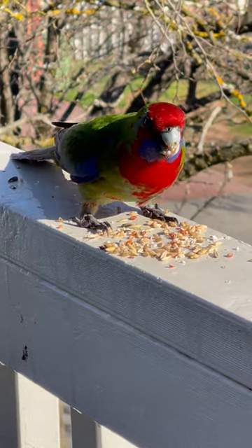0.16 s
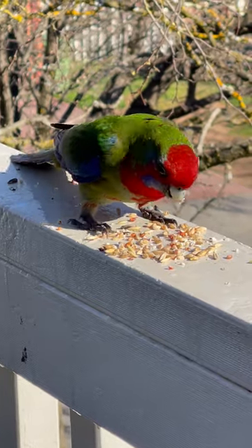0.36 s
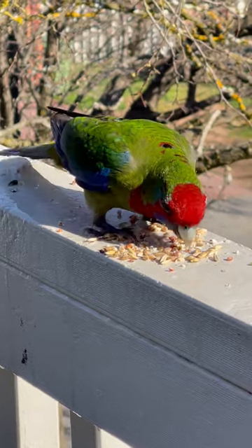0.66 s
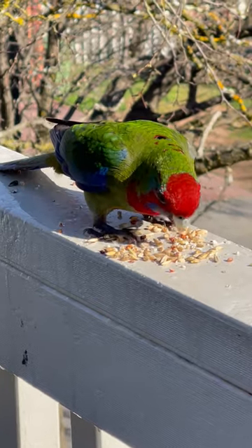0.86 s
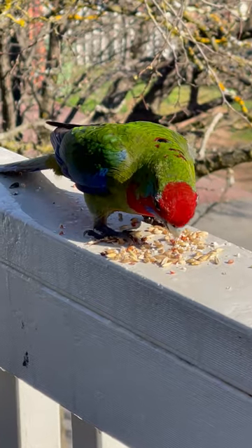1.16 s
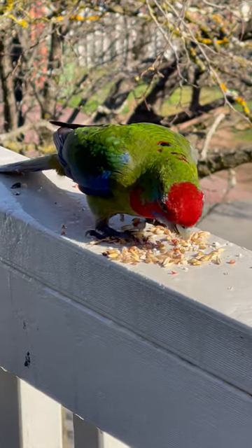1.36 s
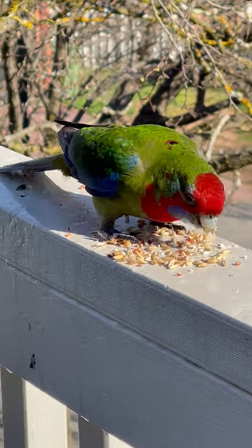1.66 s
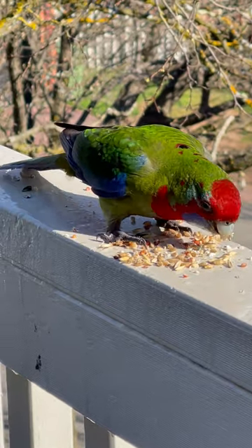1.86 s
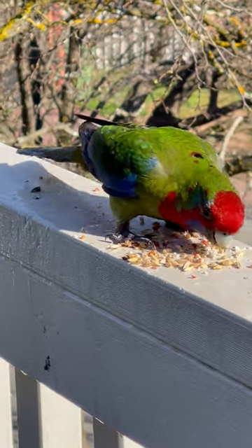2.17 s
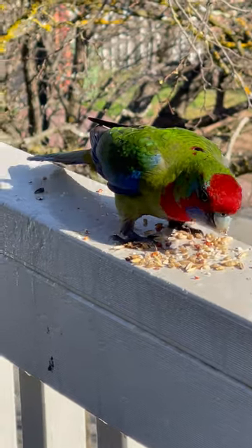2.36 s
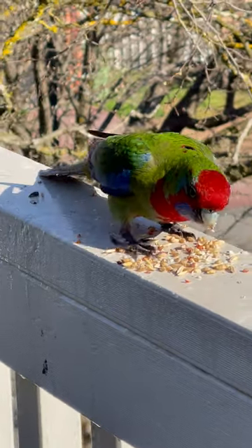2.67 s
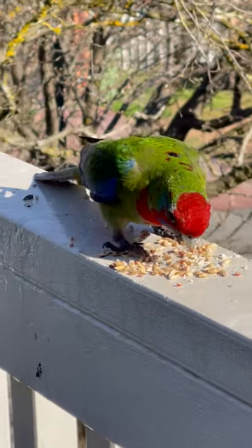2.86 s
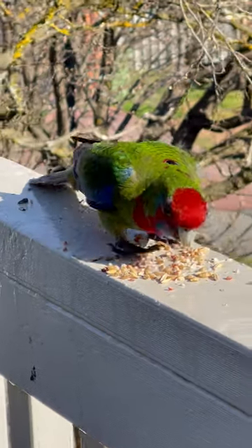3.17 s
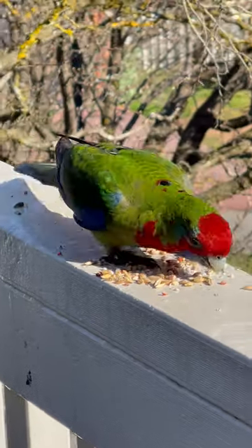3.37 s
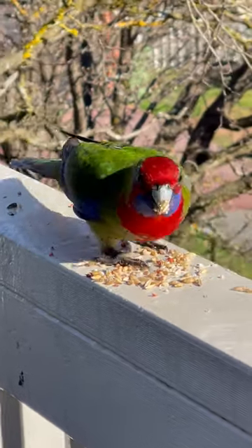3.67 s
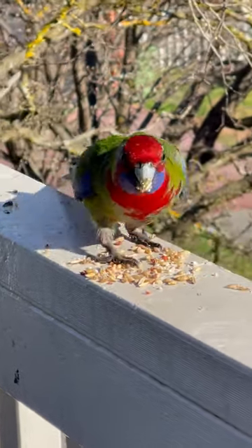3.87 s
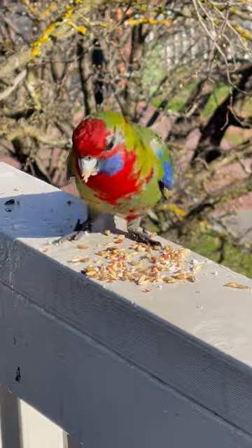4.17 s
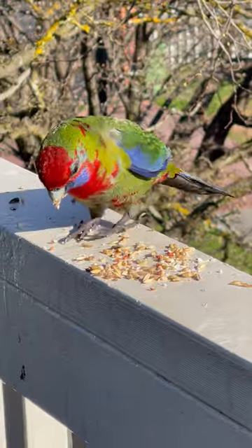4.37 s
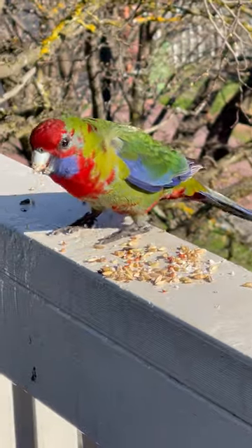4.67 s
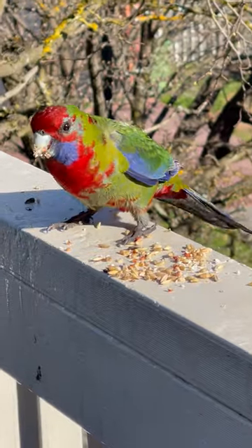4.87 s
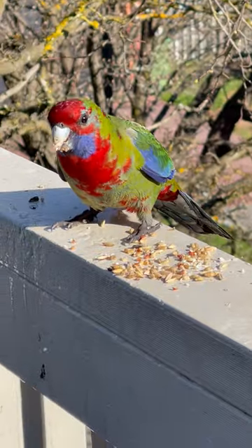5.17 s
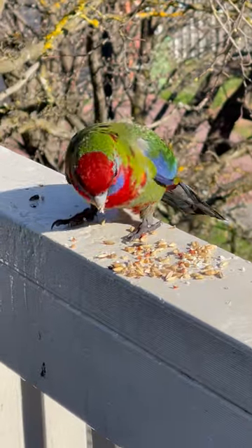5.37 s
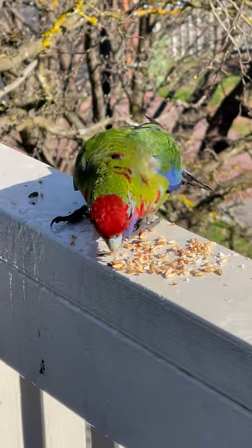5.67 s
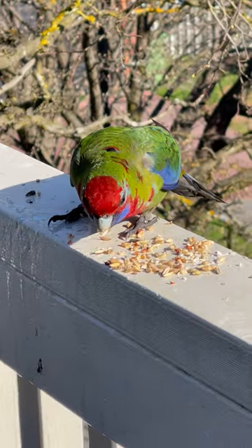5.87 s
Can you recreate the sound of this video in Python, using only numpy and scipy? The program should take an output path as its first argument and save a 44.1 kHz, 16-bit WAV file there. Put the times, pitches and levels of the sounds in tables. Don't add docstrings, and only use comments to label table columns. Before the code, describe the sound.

A quiet outdoor bed of deep town rumble and a throbbing engine hum around 83 Hz, with very faint hiss. A small dry scuff opens, then a hard bright crack at 0.1 s and the loudest, sharpest blow at 0.16 s, with a short yard echo. From 0.4 to 2.5 s come small nibbles and dull wooden knocks, while distant birds give paired falling yelps, tiny peeps, thin whistles and a brief trill near 2.5 s. A clearer snap lands at 2.5 s. Around 3.0 to 3.7 s, claws and beak scrape and skitter on the hollow rail, densest near 3.45 s. Crisp cracks follow at 4.1 and 4.6 s, a very loud one at 5.07 s, then smaller ticks and light scuffs to 6 s. A nasal warble sounds at 5.4 to 5.6 s, with rising peeps, as a vehicle's soft tyre roar and whining gears swell.

```python
import sys
import numpy as np
from scipy import signal
from scipy.fft import rfft, irfft, next_fast_len
from scipy.io import wavfile
from scipy.ndimage import uniform_filter1d

SR = 44100
rng = np.random.default_rng(int(sys.argv[2]) if len(sys.argv) > 2 else 0)


def wrap_up_sound(samples):
    columns = np.atleast_2d(samples).T
    tamed = np.clip(columns, -1, 1)
    steps = np.round(tamed * 32767).astype(np.int16)
    wavfile.write(sys.argv[1], SR, steps)


def ratio(d):
    e = np.asarray(d, float) / 20
    return 10 ** e


N = 266099
BINS_HZ = np.fft.rfftfreq(1024, 1 / SR)
FRAMES_S = np.arange(N // 256 + 5) * 256 / SR

# [t/s, level/dB]
TOWN_LEVEL = [(0.0, -56.5), (2.72, -56), (3.06, -52), (3.53, -55.5), (3.88, -54.5), (4.2, -54.5),
              (5.69, -52.5), (6.03, -54.5)]
VEHICLE_LEVEL = [(0.0, -61.5), (.5, -60), (1.3, -61.5), (2.72, -61.5), (3.56, -58), (3.96, -57), (5.6, -54),
                 (6.03, -54)]
# [f/Hz, density/dB]
TOWN_COLOUR = [(20, -52.5), (30, -28.5), (45, 1.5), (60, 3.3), (120, -4.5), (250, -8.5), (500, -22),
               (1000, -33), (2500, -58.5)]
FAR_TYRES = [(150, -6.5), (300, -4), (500, -3), (1000, -9), (1700, -13.5), (2200, -17), (3000, -22.5),
             (4000, -40), (5500, -54.5), (8000, -57)]
NEAR_TYRES = [(150, -8.5), (300, -0.5), (500, -2), (1000, -6), (1700, -13), (2200, -22), (3000, -22),
              (4000, -28.5), (5500, -29.5), (8000, -53)]
# [t/s, f/Hz, level/dB]
HUM = [(0.0, 82.58, -51), (1.1, 82.59, -48.5), (2.0, 84.1, -58), (2.64, 83.9, -53.5), (3.48, 82.5, -59),
       (4.38, 84.15, -68), (4.43, 85.6, -51.5), (5.14, 86.07, -50), (5.69, 85.04, -57.5), (6.03, 84.6, -60)]
# [t/s, f/Hz, level/dB]
GEARS = [
    [(3.15, 200, -77), (3.33, 202.6, -55.5), (3.47, 200, -67.5), (3.6, 197.7, -56), (3.85, 197, -55.5), (4.3, 193.5, -59.5), (4.45, 190.5, -66)],
    [(4.7, 188, -70), (4.95, 190, -58), (5.3, 185, -62), (5.7, 200, -57.5), (6.03, 200, -68)],
    [(4.9, 293.1, -64), (5.2, 307.7, -61.5), (5.55, 320.7, -54.5), (5.8, 322.5, -54), (5.88, 313, -60), (5.95, 290, -69)],
]
# [f/Hz, density/dB]
HISS_COLOUR = [(2000, -20), (4000, -9.5), (8800, -7), (9700, -6), (10300, 10), (10900, -13.5),
               (12000, -23.5), (12800, -31.5), (14000, -61)]

# [hardest moment t/s, build-up/s, force level/dB, body rel. level/dB, dry rasp rel. level/dB]
SCUFFS = [(0.004, 0.012, -78, 1, 8.5), (0.063, 0.011, -60.5, -13, -1.5), (0.436, 0.0059, -77.5, -13, -2),
          (0.774, 0.014, -83, -6.5, 5.5), (1.684, 0.0067, -68.5, -6, -3), (1.935, .05, -77, -2.5, -3.5),
          (2.28, 0.12, -66.5, 2, -17), (2.428, 0.019, -71, -4, -10.5), (2.808, 0.009, -75, 7, 7.5),
          (2.976, 0.027, -56.5, 10, -5.5), (3.134, 0.018, -55.5, -2, -16.5), (3.41, 0.007, -53.5, -25, -26),
          (3.43, .014, -54.5, -25.5, -22), (3.445, 0.0092, -55.5, -20, -20),
          (3.468, 0.012, -57.5, 9, -14.5), (3.583, 0.013, -51.5, 0, -39), (3.725, 0.042, -55.5, -13, -17),
          (5.326, 0.0088, -67, -3, 0), (5.56, 0.18, -72.5, 4, -7), (5.74, 0.13, -62.5, -2, -22),
          (5.96, 0.024, -70.5, -6, 6.5), (6.01, 0.046, -69, -9, -0.5)]
# [f/Hz, density/dB]
RASP_COLOUR = [(1500, -9), (3800, -5), (5500, -4), (8500, -3.5), (10500, 0), (11500, -20), (12600, -54.5)]
# [f/Hz, width/Hz, level/dB]
RAIL = [
    (1042, 360, -0.5),
    (2100, 840, 4.5),
    (3500, 2500, 0),
    (2080, 170, 1.5),
]
# [t/s, peak level/dB, f/Hz]
SLIPS = [(2.9739, -58, 3660), (2.9786, -44, 2040), (2.9806, -53, 3800), (2.9923, -54, 3640),
         (3.0101, -54, 3710), (3.1306, -53, 2040), (3.137, -42, 2104), (3.1426, -52, 2100),
         (3.4106, -45.5, 2030), (3.4277, -53, 2480), (3.43, -42.5, 2040), (3.433, -53, 2800),
         (3.439, -52, 2600), (3.4451, -38, 2100), (3.4454, -55, 2500), (3.452, -49, 3020),
         (3.4585, -52, 3550), (3.4593, -43, 2110), (3.4621, -57, 2560), (3.4639, -42, 2150),
         (3.4688, -48, 3080), (3.4712, -41, 2040), (3.4727, -53, 3670), (3.475, -50, 2950),
         (3.4771, -44, 1956), (3.478, -59, 3720), (3.481, -58, 2900), (3.486, -54, 1950),
         (3.5737, -51, 2810), (3.578, -49, 2740), (3.5864, -44.5, 1910), (3.587, -50, 2650),
         (3.5925, -53, 2710), (3.5943, -48, 1790), (3.7103, -47, 1926), (3.7158, -51, 2000),
         (3.7233, -48, 1820), (3.7368, -57, 2080)]

# [t/s, snap level/dB, brightness/dB per octave, echo rel. level/dB]
CRACKS = [(0.1095, -25.5, -1.4, -11.5), (1.6782, -51, -5.5, -4), (1.8868, -54.5, 0, -13),
          (1.913, -49.5, -15, 6.5), (2.8, -46.5, 2.5, 1), (4.1063, -50, 11.5, -6), (4.1234, -30.5, 33, -11),
          (4.32, -52, 3, -5), (4.4003, -55.5, 12, -14), (4.6403, -34.5, -1, -12.5),
          (5.0705, -16.5, -4.5, -14), (5.3211, -43, -1.5, -9), (5.334, -40.5, -12.5, -12),
          (5.4797, -48.5, -11, 5), (5.7984, -45.5, 7, -0.5), (5.9545, -38.5, -9.5, -16)]
NIBBLES = [(0.4325, -54, -9.5, -10), (0.723, -65, -12, -6.5), (2.0318, -50, -18, -8.5),
           (1.5522, -59.5, -19, -6.5), (2.145, -57, -11, -6), (2.2748, -48, -14.5, -7),
           (2.373, -53, -14.5, -8), (2.515, -38.5, -4, -6.5), (2.603, -53, -3, -3), (2.9531, -47, 0, -4),
           (3.5722, -46, 11, -1.5), (4.5955, -58.5, 15.5, -11), (5.6073, -55.5, -6, 5.5), (5.9, -55, -7, 2)]
# [t/s, snap level/dB, knock rel. level/dB, echo rel. level/dB]
PECKS = [
    (0.16, -7, -27, -16.5),
    (1.5528, -65.5, 16.5, -11),
    (2.0323, -67.5, 18, 3),
    (3.5404, -63, 18.5, -2),
]
# [f/Hz, density/dB]
SNAP_COLOUR = [(700, -42.5), (1300, -25), (2000, -33.5), (3000, -27.5), (4200, -13.5), (5500, -10.5),
               (7000, 0), (8500, 2.5), (10750, 5.5), (11600, -12.5), (12500, -21.5), (13600, -18.5),
               (15200, -39.5), (16500, -42)]
# [t/s, peak level/dB, f/Hz, swell/s]
RINGS = [(.1618, -38.5, 2600, 0.00048), (2.7, -56, 4300, 0.00032), (2.8, -39, 13800, .0003),
         (2.5166, -48.5, 5200, 0.00045), (2.5168, -42, 2950, .0007), (1.68, -61.5, 5600, 0.00101),
         (1.691, -63, 5600, 0.00101), (2.5064, -46, 13600, 0.00035), (4.1245, -38, 13400, 0.00009),
         (4.1245, -53, 5600, 0.00027), (4.642, -43.5, 4020, 0.00042), (5.0721, -32, 4260, .0003),
         (5.0719, -36, 13500, .0003), (3, -47, 2400, 0.00021), (1.5535, -54, 1800, 0.00017),
         (2.0335, -53, 2200, .0002), (3.727, -62, 6900, 0.0011), (4.5, -43, 3250, 0.00028),
         (.1672, -31.5, 6300, .0003), (.1686, -31, 8600, 0.00043), (2.756, -61.5, 7500, 0.00036),
         (5.9012, -56, 8000, .0003)]
# [t/s, level/dB]
BOUNCES = [(.0025, -23), (.0053, -10.5), (.0069, -8)]
# [f/Hz, t60/s]
YARD_DECAY = [(1000, 0.1), (3000, 0.21), (6000, 0.2), (9000, 0.2), (12000, 0.12), (13500, 0.029)]

# [t/s, length/s, from f/Hz, to f/Hz, top
# level/dB]
PEEPS = [(0.322, 0.032, 2070, 2520, -60), (0.359, 0.016, 2020, 2640, -57), (0.482, 0.041, 3410, 3750, -75),
         (0.52, .014, 3690, 2980, -69.5), (0.534, 0.03, 3020, 2820, -65), (0.81, 0.038, 2335, 2200, -66),
         (0.885, 0.057, 4600, 3800, -83.5), (0.937, .04, 1910, 1900, -65.5),
         (2.306, 0.038, 2190, 2770, -62.5), (2.675, 0.052, 6040, 5750, -74), (2.73, .07, 5880, 5700, -83),
         (2.803, .09, 5800, 5600, -82), (2.668, .02, 5350, 5050, -78), (2.71, .04, 5150, 5150, -83),
         (3.293, .055, 3356, 3250, -75.5), (5.23, 0.021, 3440, 4430, -64), (5.258, .026, 4450, 4150, -72),
         (5.353, 0.027, 3230, 4550, -68), (5.612, 0.027, 3290, 4770, -63), (5.728, 0.036, 3060, 4870, -61),
         (3.694, .036, 10550, 11000, -61), (5.921, 0.024, 2600, 2620, -64),
         (.874, .022, 4000, 3300, -69), (.9, .014, 3950, 3350, -68), (1.008, .022, 6300, 5950, -78),
             (.485, .05, 6900, 7400, -81), (2.391, .016, 2650, 2550, -65), (.434, .016, 3500, 3150, -68),
             (.555, .02, 2600, 2350, -68), (.572, .03, 2300, 2100, -68), (.672, .014, 2300, 2350, -69),
             (.862, .014, 2300, 2300, -68), (.96, .02, 2550, 2350, -68), (4.43, .04, 3350, 3300, -72)]
# [t/s, level/dB, wait before second/s, second rel. level/dB]
YELPS = [(0.417, -57.5, .044, -13), (0.541, -60, 0.036, -8), (0.673, -60.5, 0.037, -5),
         (0.809, -61, 0.041, -6), (0.941, -63.5, 0.038, -3.5), (1.08, -63, 0.034, -6),
         (1.207, -63.5, 0.036, -2), (1.347, -65, 0.038, -5), (2.38, -64, .031, -9),
         (2.504, -64.5, 0.032, -16), (2.641, -66, .045, -16)]
# [t/s, length/s, f/Hz, level/dB]
WHISTLES = [
    (0.568, 0.043, 3090, -69),
    (0.913, 0.089, 2990, -65),
    (1.721, 0.085, 3000, -64),
    (2.204, 0.092, 2905, -62),
    (2.655, 0.094, 2910, -63.5),
]
# [t/s, f/Hz, level/dB]
SWOOP = [(2.272, 4200, -78), (2.287, 3950, -68), (2.3, 3720, -63), (2.315, 3560, -71), (2.328, 3500, -70),
         (2.342, 3800, -76)]
# [t/s, f/Hz, level/dB]
TRILL = [(2.432, 3030, -72), (2.465, 3125, -61), (2.545, 3200, -65), (2.565, 3050, -68), (2.59, 3130, -65),
         (2.6, 3000, -69), (2.618, 3220, -67), (2.625, 3200, -69)]
# [t/s, f/Hz, level/dB]
WARBLE = [(5.396, 730, -68), (5.43, 795, -63), (5.445, 760, -60), (5.456, 892, -56), (5.469, 855, -56.5),
          (5.475, 773, -54), (5.515, 725, -55), (5.526, 778, -59), (5.538, 755, -55), (5.55, 870, -54.5),
          (5.568, 840, -56), (5.582, 780, -64)]
# [f/Hz, level/dB]
BEAK = [(600, -30), (1650, -8), (2200, -9), (2600, 1.5), (3050, -1.5), (3450, -15), (3800, -15),
        (4500, -19), (5500, -34)]

# [f/Hz, phase/rad]
PORT_LAG = [(0, 0), (1700, 0), (2700, .7), (3900, .7), (4450, 1.4), (4800, 3.05), (5200, 5.0), (5600, 6.1),
            (6200, 6.5), (8000, 8.5), (9150, 9.55), (10300, 10.5), (11300, 11.7), (11900, 12.5),
            (13500, 13.3), (22050, 13.4)]
# [f/Hz, likeness 0..1]
PORT_LIKENESS = [(100, .999), (300, .95), (600, .72), (1000, .72), (1400, .5), (1750, .95), (3000, .97),
                 (5000, .97), (12000, .94)]
# [f/Hz, level/dB]
PORT_LEAN = [(60, -.5), (300, -2), (600, -4.5), (1200, -1.5), (1700, 0.3), (12000, 0.5)]
# [f/Hz, level/dB]
MIC = [(15, -40), (28, -16), (42, -1), (60, 1.5), (90, 0), (11700, 0), (12300, -9), (12800, -24),
       (14000, -18)]


def evened(x):
    return x / np.sqrt(np.mean(x ** 2) + 1e-20)


def drift(length, size):
    return evened(uniform_filter1d(rng.standard_normal(length), size=size))


def read(points, hz):
    f, value = np.transpose(points)
    return np.interp(np.log(hz + 1), np.log(f + 1), value)


def along(rows):
    s, *columns = np.transpose(rows)
    t = np.arange(s[0], s[-1], 1 / SR)
    return s[0], [np.interp(t, s, c) for c in columns]


def level_over_time(rows):
    return np.interp(np.arange(N) / SR, *np.transpose(rows))


def add(mix, s, sound):
    part = mix[round(s * SR):][:len(sound)]
    part += sound[:len(part)]


def resonate(x, hz, width):
    turn = np.exp(2j * np.pi * np.cumsum(hz * np.ones(len(x))) / SR)
    r = np.exp(-np.pi * width / SR)
    return 2 * (turn * signal.lfilter([1 - r], [1, -r], x / turn)).real


def resonate_twice(x, hz, width, second_width):
    return evened(resonate(resonate(x, hz, width), hz, second_width))


def air(density_db, patchy_db):
    a, b, c, d, patches = rng.standard_normal((len(FRAMES_S), len(BINS_HZ), 5)).T
    patches = evened(uniform_filter1d(uniform_filter1d(patches, size=12, axis=0), size=14, axis=1))
    same = np.clip(read(PORT_LIKENESS, BINS_HZ), 0, 1)[:, None]
    left = a + 1j * b
    right = same * left + np.sqrt(1 - same ** 2) * (c + 1j * d)
    z = np.array([left, right]) * ratio(density_db + patchy_db * patches)
    return evened(signal.istft(z, nperseg=1024, noverlap=768)[1][:, :N])


def tone(hz, db, waver=0.00066, soft_s=0.008):
    tremble = 1 + waver * drift(len(hz), 200)
    ends = signal.windows.tukey(len(hz), min(2 * soft_s * SR / len(hz), 1))
    return np.sqrt(2) * ratio(db) * np.sin(2 * np.pi * np.cumsum(hz * tremble) / SR) * ends


def throb(hz, db, width, second_width):
    return ratio(db) * resonate_twice(rng.standard_normal(len(hz)), hz, width, second_width)


def rings(rows):
    out, t = np.zeros(N), np.arange(1024) / SR
    for s, db, hz, swell_s in rows:
        envelope = t / swell_s * np.exp(1 - t / swell_s)
        add(out, s - swell_s, ratio(db) * envelope * np.sin(2 * np.pi * hz * t))
    return out


def yard(x):
    taps, at = np.zeros(SR // 4), np.arange(60, SR // 4 - 20, 12)
    taps[at + rng.integers(0, 12, len(at))] = rng.choice([-1., 1.], len(at))
    hz, t, z = signal.stft(taps, SR, nperseg=128)
    decay = ratio(-60 * t / read(YARD_DECAY, hz)[:, None])
    tail = signal.istft(z * decay, SR, nperseg=128)[1]
    return signal.fftconvolve(x, tail / np.linalg.norm(tail))[:N]


def town_rumble():
    return ratio(level_over_time(TOWN_LEVEL) + 2) * air(read(TOWN_COLOUR, BINS_HZ)[:, None], patchy_db=1)


def tyre_roar():
    nearness = np.clip((FRAMES_S - 1.5) / 4.2, 0, 1)
    far_db = np.outer(read(FAR_TYRES, BINS_HZ), 1 - nearness)
    near_db = np.outer(read(NEAR_TYRES, BINS_HZ), nearness)
    return ratio(level_over_time(VEHICLE_LEVEL) + 1.5) * air(far_db + near_db, patchy_db=1.5)


def engine_hum():
    out = np.zeros(N)
    s, (hz, db) = along(HUM)
    octave_db = -60.5 - 0.086 * (db - db.mean())
    add(out, s, tone(hz, db + 0.5) + throb(hz, db - 8, 54, 18))
    add(out, s, tone(2 * hz, octave_db - 5) + throb(2 * hz, octave_db - 7.5, 12, 11))
    return out


def phone_circuit():
    ticks_per_s, first_tick, tick_hz = 59.969, 0.38, 10180
    cycle = (np.arange(N) / SR * ticks_per_s - first_tick + 0.5) % 1 - 0.5
    puffs = rng.standard_normal(N) * np.exp(-(cycle / 0.1) ** 2)
    ticks = ratio(-80) * resonate_twice(puffs, tick_hz, 700, 700)
    return ticks + ratio(-79.5) * air(read(HISS_COLOUR, BINS_HZ)[:, None], patchy_db=4.5)


def scuffs():
    build_db, let_go_db_per_s, rasp_let_go_db_per_s, slip_swell_s = 20, 300, 381, 0.0019
    slips = rng.standard_normal(N) * ratio(3 * np.minimum(rng.exponential(1, N), 3))
    clumps = ratio(2.2 * drift(N, 110))
    low, hollow, body, core = (ratio(db) * resonate_twice(slips * clumps, hz, width, width)
                               for hz, width, db in RAIL)
    wood = ratio(-8) * (low + hollow + core)
    rasp = air(read(RASP_COLOUR, BINS_HZ)[:, None], patchy_db=4.5)[0] * evened(clumps ** 0.53)
    t, out = np.arange(N) / SR, np.zeros(N)
    for s, build_s, force_db, body_db, rasp_db in SCUFFS:
        part = slice(max(round((s - build_s) * SR), 0), round((s + 0.15) * SR))
        before = np.minimum(t[part] - s, 0)
        after = np.maximum(t[part] - s, 0)
        press_db = force_db + build_db * before / build_s
        ring = wood[part] + ratio(body_db - 9) * body[part]
        out[part] += ratio(press_db - let_go_db_per_s * after) * ring
        out[part] += ratio(press_db + rasp_db + 9.5 - rasp_let_go_db_per_s * after) * rasp[part]
    out += ratio(-2.5) * rings([(s, db, hz, slip_swell_s) for s, db, hz in SLIPS])
    return out + ratio(-9.5) * yard(out)


def snap(bright_db, abrupt):
    hz = BINS_HZ
    gain_db = read(SNAP_COLOUR, hz) + bright_db * np.log2((np.minimum(hz, 10500) + 300) / 8000)
    both = signal.hilbert(np.log(ratio(np.r_[gain_db, gain_db[-2:0:-1]])))
    spectrum = np.exp(both.real - 1j * abrupt * both.imag)
    taps = np.roll(np.fft.ifft(spectrum).real, 64)[:len(gain_db)]
    return (taps / abs(taps).max())[:512]


def knock(hz):
    t = np.arange(512) / SR
    swell = np.pi * 0.44 * hz * t
    return np.e * swell * np.exp(-swell) * np.sin(2 * np.pi * hz * t)


def cracks():
    knock_hz, peck_hz, abrupt, peck_abrupt = 2640, 1273, 0.31, 0.82
    hits = [(s, db, -18.5, knock_hz, bright, abrupt, echo) for s, db, bright, echo in CRACKS]
    hits += [(s, db, -2, knock_hz, bright, abrupt, echo) for s, db, bright, echo in NIBBLES]
    hits += [(s, db, knock_db, peck_hz, 0, peck_abrupt, echo) for s, db, knock_db, echo in PECKS]
    near, far = np.zeros(N), np.zeros(N)
    for s, snap_db, knock_db, hz, bright_db, sharpness, echo_db in hits:
        late_knock = np.roll(knock(hz), 42 + round(SR / hz))
        hit = ratio(snap_db + 4) * (snap(bright_db, sharpness) + ratio(knock_db - 4) * late_knock)
        s -= 0.0002
        add(near, s, hit)
        add(near, s + 0.0006, ratio(-10) * hit)
        add(far, s, ratio(echo_db) * hit)
    bounced = sum(ratio(db) * np.roll(far, round(s * SR)) for s, db in BOUNCES)
    rung = rings(RINGS)
    return near + rung + bounced + yard(far + ratio(-9.5) * rung)


def peeps():
    out = np.zeros(N)
    for s, length, from_hz, to_hz, top_db in PEEPS:
        hz = np.linspace(from_hz, to_hz, round(length * SR))
        db = top_db - 5 * np.linspace(-1, 1, len(hz)) ** 2
        flicker = ratio(2.6 * drift(len(hz), 180))
        add(out, s, flicker * tone(hz, db - 4.5, waver=0.004))
    return out


def yelps():
    length_s, from_hz, to_hz = 0.043, 1900, 1340
    hz = to_hz + (from_hz - to_hz) * np.linspace(1, 0, round(length_s * SR)) ** 1.3
    fade_db = -9 * np.linspace(-0.6, 1, len(hz)) ** 2
    out = np.zeros(N)
    for s, db, wait, second_db in YELPS:
        add(out, s, tone(hz, db + 1.5 + fade_db))
        add(out, s + wait, tone(hz[len(hz) // 8:] * 1.03, db + second_db + 1))
    return out


def whistles():
    out = np.zeros(N)
    for s, length, hz, db in WHISTLES:
        left = length - np.arange(0, length, 1 / SR)
        bow = 0.012 * np.sin(2.5 * left / length)
        hook = 0.22 * np.clip(1 - left / 0.021, 0, 1) ** 1.5
        add(out, s, tone(hz * (1 + bow - hook), db - 1 - 3 * left / length, waver=0.002))
    return out


def swoop():
    out = np.zeros(N)
    s, (hz, db) = along(SWOOP)
    add(out, s, tone(hz, db, waver=0.002))
    return out


def trill():
    beats_per_s, smooth_from_s = 62, 2.575
    out = np.zeros(N)
    s, (hz, db) = along(TRILL)
    t = s + np.arange(len(hz)) / SR
    beat = (t * beats_per_s) % 1
    chopped = np.clip((smooth_from_s - t) / 0.02, 0.35, 1)
    pips = tone(hz * (1 + 0.1 * chopped * (beat - 0.5)), db, waver=0.002)
    add(out, s, pips * (1 - chopped + chopped * np.sin(np.pi * beat) ** 4))
    return out


def passing_gears():
    out = np.zeros(N)
    for rows in GEARS:
        s, (hz, db) = along(rows)
        add(out, s, tone(hz, db + 0.5, waver=0.022) + throb(hz, db - 10, 14, 8))
    return out


def warble():
    out = np.zeros(N)
    s, (hz, db) = along(WARBLE)
    turns = np.cumsum(hz * (1 + 0.006 * drift(len(hz), 120))) / SR
    stack = sum(ratio(read(BEAK, k * hz)) * np.sin(2 * np.pi * k * turns) for k in range(1, 8))
    add(out, s, ratio(db + 4.5) * stack * signal.windows.tukey(len(hz), 0.1))
    return out


def birds():
    far = peeps() + yelps()
    near = whistles() + swoop() + trill() + warble()
    late = np.roll(far, round(0.037 * SR))
    return near + far + yard(ratio(-11) * near + ratio(-5) * far + ratio(-10) * late)


def scene():
    bed = town_rumble() + tyre_roar() + engine_hum() + phone_circuit()
    return bed + scuffs() + cracks() + birds() + passing_gears()


def low_pass(x):
    return signal.sosfilt(signal.butter(12, 16600, fs=SR, output="sos"), x)


def record(dry):
    size = next_fast_len(N + 2048)
    hz = np.fft.rfftfreq(size, 1 / SR)
    lean = ratio(read(PORT_LEAN, hz) / 2)
    lag = np.exp(-1j * np.interp(hz, *np.transpose(PORT_LAG)))
    ports = np.array([lean, lag / lean]) * ratio(read(MIC, hz))
    mix = irfft(rfft(dry, size) * ports, size)[:, :N]
    return low_pass(mix)


dry = scene()
out = record(dry)
wrap_up_sound(out)
```